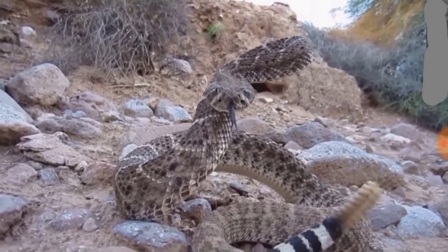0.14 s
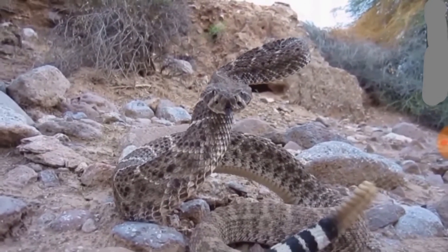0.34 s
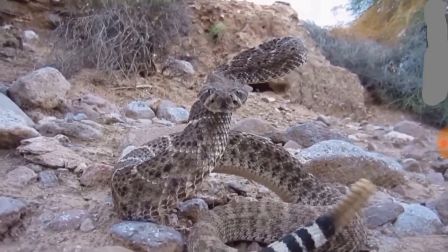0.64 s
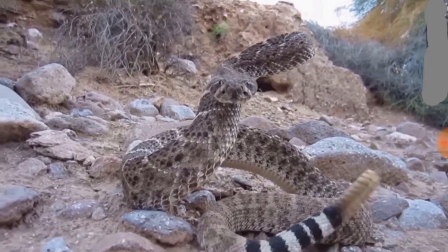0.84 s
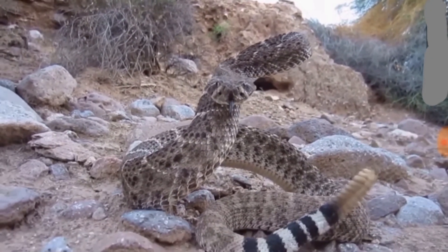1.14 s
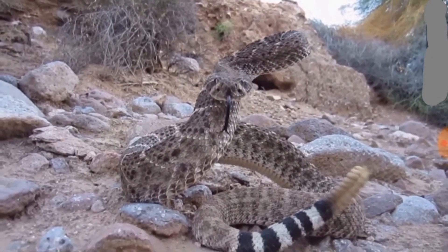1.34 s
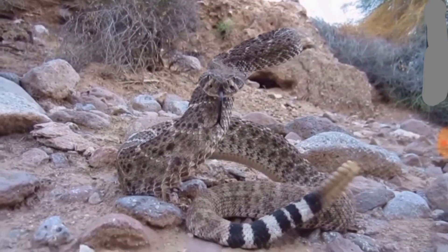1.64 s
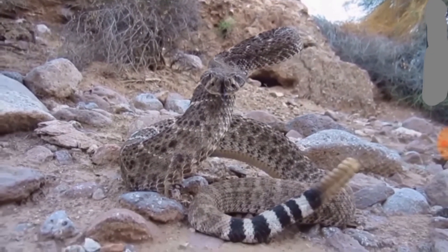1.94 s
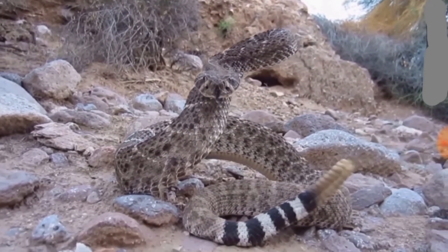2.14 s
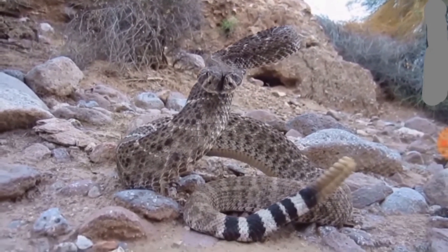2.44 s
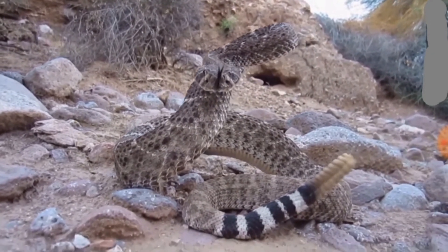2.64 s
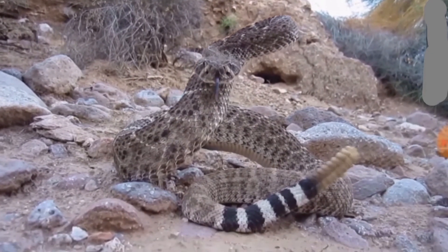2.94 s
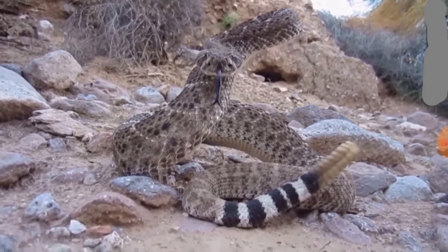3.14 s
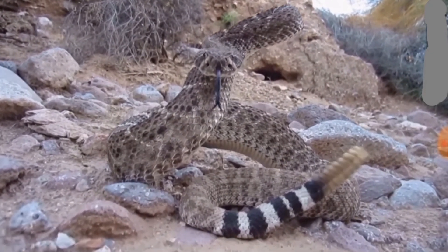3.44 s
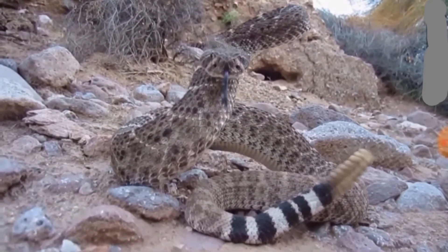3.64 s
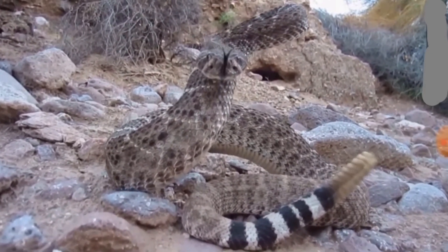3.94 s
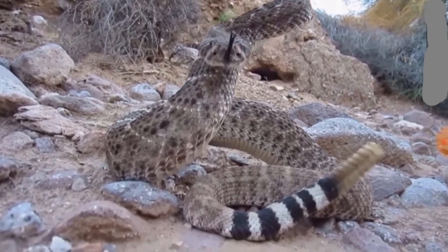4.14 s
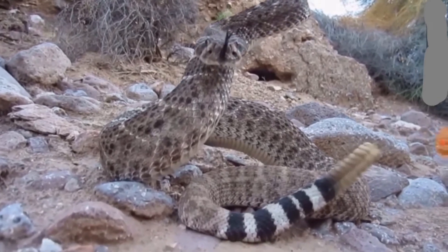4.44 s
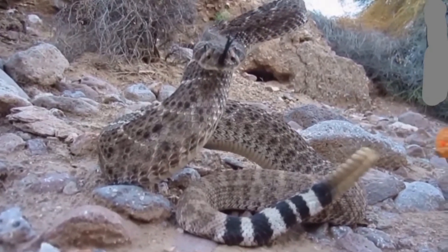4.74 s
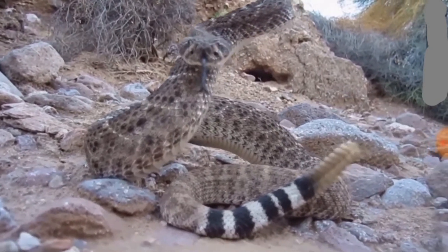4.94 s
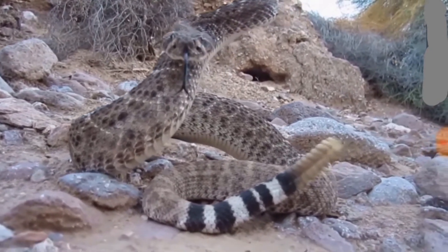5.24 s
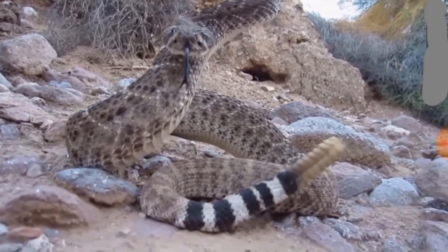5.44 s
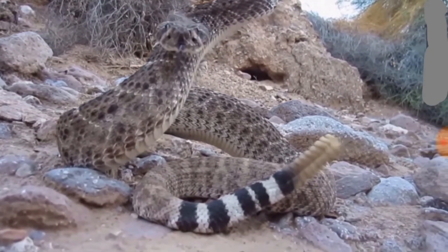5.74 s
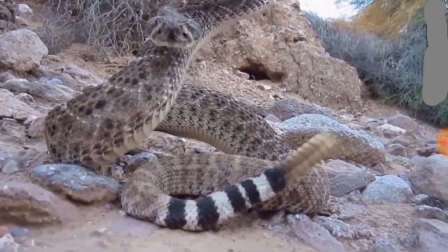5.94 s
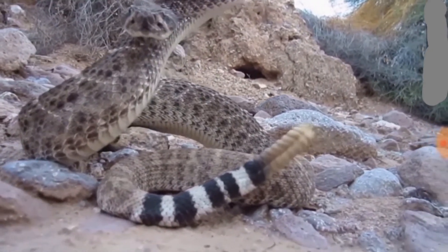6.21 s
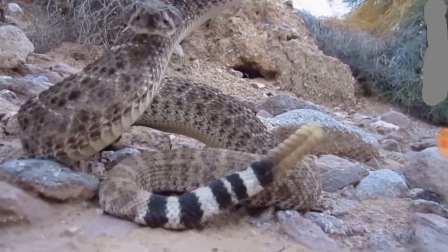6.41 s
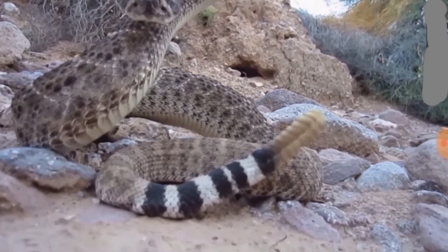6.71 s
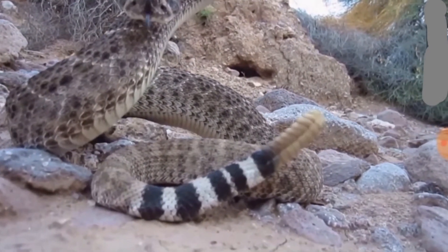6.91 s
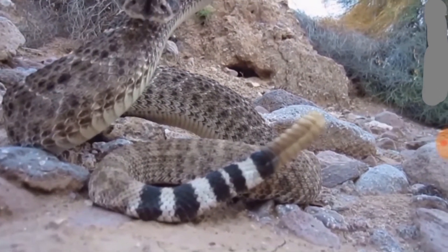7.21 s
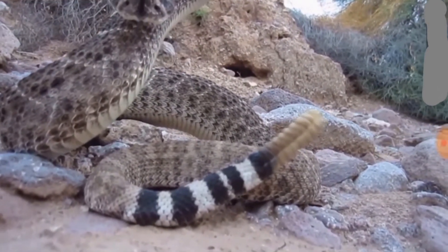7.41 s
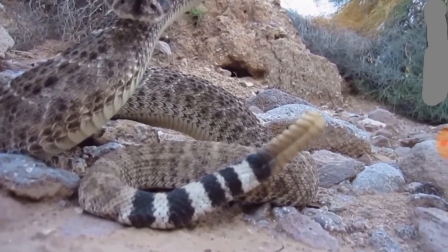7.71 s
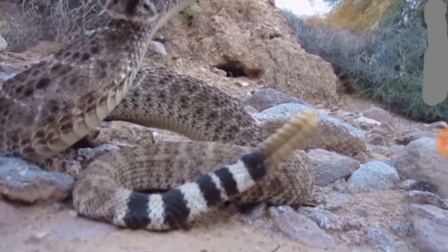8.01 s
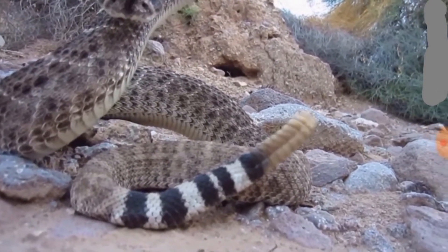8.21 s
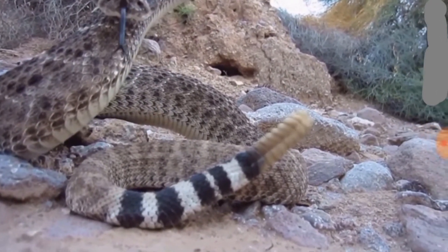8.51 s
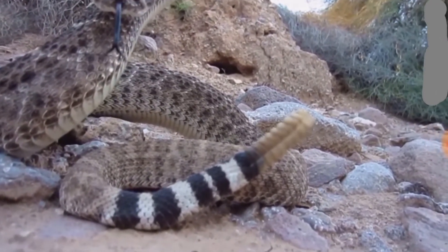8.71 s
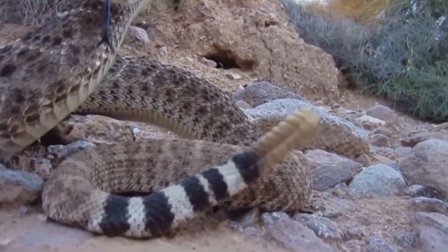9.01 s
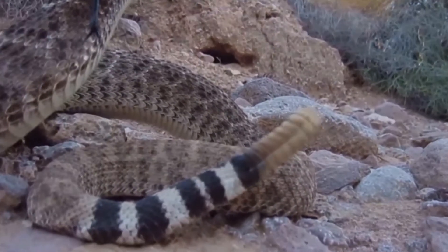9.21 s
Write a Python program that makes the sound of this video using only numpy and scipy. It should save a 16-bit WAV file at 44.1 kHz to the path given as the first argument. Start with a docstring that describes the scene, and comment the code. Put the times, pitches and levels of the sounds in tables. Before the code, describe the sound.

Unbroken bright rattlesnake rattling, like fast-shaken dry husks, with faint low pops beneath that thicken as the microphone moves close, plus brief handling knocks.

```python
"""Rattlesnake and creeping microphone

A rattlesnake shakes its tail about fifty times a second: loose hollow segments clack densely and ring in
broad resonances, whose balance shifts as the microphone creeps nearer over the stones. The level dips
suddenly now and then and creeps back. Brief faint low tones come in clumps, low pops thud under the
rattle, and falling sweeps make a few knocks that travel up the microphone's mount."""
import sys
import numpy as np
from scipy import signal
from scipy.io import wavfile
from scipy.ndimage import uniform_filter1d

SR = 44100
rng = np.random.default_rng(int(sys.argv[2]) if len(sys.argv) > 2 else 0)


def generate_wav(signal):
    """Clip the signal to [-1, 1] and save it as 16-bit WAV at the path in sys.argv[1]."""
    frames = np.transpose(np.atleast_2d(signal))
    scaled = np.clip(frames, -1, 1) * 32767
    pcm = np.round(scaled).astype(np.int16)
    wavfile.write(sys.argv[1], SR, pcm)


N = 412776

# Nearness of the microphone: (time [s], nearness [0 far to 1 close])
MIC_NEARNESS = [(0.7, 0.18), (2.1, 0.23), (3.7, 0.48), (5.1, 0.45), (6.6, 1.0), (8.6, 1)]

SWING_HZ, SWING_DEPTH_DB = 49.3, 0.5
CLACKS_PER_S, CLACK_SPREAD_DB = 16000, 1.34
SHARP_CLACK_DB, SHARP_FROM_HZ = 0.5, 4500   # finer pulsing within each swing, in the treble only
LOW_PATCH_DB_HZ, LOW_PATCH_PER_S = 2400, 14   # dip in dB times resonance in Hz; rate of the drift
DIP_S, RECOVERY_S = 0.0072, 0.34
TONES_PER_S, TONE_S, TONE_DB, TONE_SPREAD_DB = 50, 0.036, -55.5, 3   # level of the lowest tones
POP_RISE_MS, POP_DECAY_MS, SMALL_POP_DECAY_MS = 0.22, 1.46, 1.9
SMALL_POPS_PER_S = 12
FAR_UNTIL_S = 2.4   # pops up to here carry less deep bass
KNOCK_BASS_CUT_HZ = 230
FLOOR_DB = -71
CUTOFF_HZ = 11150
OFFSET = -0.0001   # full scale is 1


def from_db(db):
    """Decibels to gain."""
    return 10 ** (np.asarray(db) / 20)


def rms_one(x):
    """Scale to rms 1."""
    return x / np.sqrt(np.mean(x ** 2) + 1e-20)


def along(rows, s):
    """A curve of (time, value) read at the times s."""
    return np.interp(s, *np.transpose(rows))


def drift(rate):
    """Slow chance: noise at every 40th sample through a double one-pole low-pass at rate Hz; rms 1."""
    r = np.exp(-80 * np.pi * rate / SR)
    noise = rng.standard_normal(N // 40 + 2002)
    slow = signal.lfilter([1], [1, -2 * r, r * r], noise)[2000:]   # skip the filter's start
    return np.interp(np.arange(N) / 40, np.arange(len(slow)), rms_one(slow))


def resonate(x, hz, width):
    """Two-pole resonance applied twice, gain about 1 on top."""
    r = np.exp(-np.pi * width / SR)
    b = (1 - r * r) / 2 * np.array([1, 0, -1])
    a = [1, -2 * r * np.cos(2 * np.pi * hz / SR), r * r]
    return signal.lfilter(b, a, signal.lfilter(b, a, x))


def heard_level_db(t):
    """The level at which the rattle is heard; each dip falls fast and slowly recovers."""
    # Level before the dips: (time [s], level [dB])
    level_before_dips = [(0.0, -25.5), (1.0, -25.5), (2.0, -25), (3.0, -24.5), (4.3, -24.5), (5.2, -26.5),
                         (6.1, -26.5), (6.7, -25), (7.5, -25), (8.0, -24.5), (8.6, -26), (9.1, -28.5),
                         (9.36, -31)]
    # Sudden dips in level: (time [s], depth [dB])
    sudden_dips = [(1.99, 2.5), (2.92, 2.5), (3.78, 2), (4.21, 2), (7.14, 3.5), (8.01, 1.5), (8.67, 0.7),
                   (9.11, 2)]
    level_db = along(level_before_dips, t)
    for s, depth_db in sudden_dips:
        since = np.maximum(t - s, 0)
        level_db = level_db - depth_db * np.minimum(since / DIP_S, 1) * np.exp(-since / RECOVERY_S)
    return level_db


def swell_db(t, hz):
    """Passing swells and fades, added to the resonances within 3 % of their pitch."""
    # Bell-shaped level curves: (resonance [Hz], middle [s], half length [s], gain [dB])
    passing_swells = [(2930, 0.55, 0.99, -11), (3990, 2.14, 0.84, 7), (4370, 3.5, 0.77, 4),
                      (6740, 5.3, 0.57, -2), (1177, 2.2, 0.34, -2.5), (7717, 6, .5, 2),
                      (7000, 5.9, .5, 1.5), (3750, 3.7, 1.0, 5), (3290, 4.1, 0.59, 0.5),
                      (2930, 4.6, 0.65, -4.5), (2920, 1.8, 0.6, -2.5)]
    return sum(db * np.exp(-((t - s) / half) ** 2)
               for at_hz, s, half, db in passing_swells if abs(at_hz / hz - 1) < .03)


def rattle():
    """Clacks swell with each swing of the tail; every resonance takes each clack with its own sign and size."""
    # Segment resonances, relative levels:
    # (centre [Hz], width of each pass [Hz], far [dB], half way [dB], close [dB])
    segment_resonances = [(249, 150, -31, -24, -24), (345, 133, -21, -23, -17),
                          (468, 150, -24.5, -20.5, -19.5), (603, 205, -22.5, -20, -17.5),
                          (854, 416, -15, -13.5, -13), (1177, 523, -11.5, -10, -9),
                          (1600, 400, -13.5, -17, -15.5), (2152, 440, -8.5, -8.5, -7.5),
                          (2370, 230, -7, -2.5, -14), (2573, 297, -1, -9, -7.5), (2912, 520, -12.5, -7, -5),
                          (3287, 375, -8.5, -0.5, -2.5), (3505, 356, -1, -2, -2.5),
                          (3746, 230, -18, -8, -7.5), (3990, 150, -10, -7, -8), (4365, 460, -13.5, -11, -8),
                          (4906, 440, -11.5, -14, -14.5), (5397, 490, -9.5, -11, -8.5),
                          (5740, 370, -11.5, -9, -8.5), (6080, 510, -10.5, -7, -9),
                          (6690, 710, -10, -10.5, -8.5), (7090, 340, -15, -5.5, -2),
                          (7340, 420, -9.5, -1.5, -4), (7760, 850, -10, -10.5, -8.5),
                          (8800, 430, -22, -16.5, -18), (9250, 560, -17.5, -19, -17),
                          (9810, 630, -20.5, -19.5, -19.5), (10230, 400, -29, -29, -21),
                          (11230, 520, -20, -16, -12.5), (2740, 140, -9, -20, -22),
                          (3400, 180, -3, -12, -14), (4160, 250, -13, -23, -20)]
    t = np.arange(N) / SR
    turn = 2 * np.pi * np.cumsum(SWING_HZ * (1 + 0.0152 * drift(1.6))) / SR
    swing = from_db(SWING_DEPTH_DB * (np.cos(turn) + 1.5 * np.cos(2 * turn)))
    bunched = from_db(SHARP_CLACK_DB * (np.cos(3 * turn) + np.cos(4 * turn)))
    struck = rng.random(N) < CLACKS_PER_S / SR
    clacks = struck * from_db(CLACK_SPREAD_DB * np.minimum(rng.exponential(1, N), 5))
    unevenness_db = 0.45 * drift(23.0)   # the shake is never quite steady
    near = along(MIC_NEARNESS, t)
    out = np.zeros(N)
    for hz, width, *levels_db in segment_resonances:
        balance_db = np.interp(near, [0, .5, 1], levels_db) + swell_db(t, hz) + 1.28 * drift(8.9)
        if hz < 600:   # the low resonances are made patchy by random dips
            balance_db -= LOW_PATCH_DB_HZ / hz * np.abs(drift(LOW_PATCH_PER_S))
        pulsing = swing * bunched if hz > SHARP_FROM_HZ else swing
        strikes = pulsing * clacks * rng.standard_normal(N)
        out += from_db(balance_db + unevenness_db) * resonate(strikes, hz, width)
    # small shells radiate no bass
    out = signal.sosfilt(signal.butter(8, 150, "high", fs=SR, output="sos"), out)
    running_rms = np.sqrt(uniform_filter1d(out ** 2, SR // 6))
    return from_db(heard_level_db(t)) * out / running_rms   # the slow level follows heard_level_db alone


def low_tones():
    """Brief faint low sine tones in clumps, at random pitches."""
    # Pitch limits [Hz]: lowest far, lowest close, highest
    pitch_limits = [135, 80, 520]
    chance = TONES_PER_S * from_db(5.0 * drift(3.0)) / SR
    starts = np.flatnonzero(rng.random(N) < chance)
    size, pitch = rng.standard_normal(len(starts)), rng.random(len(starts))
    lowest = np.interp(along(MIC_NEARNESS, starts / SR), [.2, 1], pitch_limits[:2])
    pitch_hz = lowest * (pitch_limits[2] / lowest) ** pitch
    level_db = TONE_DB + TONE_SPREAD_DB * size + 3.0 * pitch
    sample = np.arange(round(TONE_S * SR))
    fade = np.hanning(len(sample))
    out = np.zeros(N + len(sample))
    for at, db, hz in zip(starts, level_db, pitch_hz):
        out[at:at + len(sample)] += from_db(db) * fade * np.sin(2 * np.pi * hz * sample / SR)
    return out[:N]


def thuds(rows, order):
    """A pulse that rises fast and dies away; a high-pass then swings it back through zero."""
    ms = np.arange(-200, 2400) / SR * 1000
    out = np.zeros(N + 2600)
    for s, level_db, return_hz, sign, decay_ms in rows:
        at = round(s * SR)
        rise = np.exp(-(ms / POP_RISE_MS) ** 2)
        decay = np.exp(-(np.abs(ms) / decay_ms) ** 0.88)
        shape = np.where(ms < 0, rise, decay)
        swing_back = signal.butter(order, return_hz, "high", fs=SR, output="sos")
        pulse = signal.sosfilt(swing_back, shape + 1e-18)
        out[at:at + len(ms)] += np.sign(sign) * from_db(level_db) * pulse
    return out[200:N + 200]   # time zero is the top of the pulse


def small_pops():
    """A patter of thin low pops at random moments, with random sign."""
    # Typical level before the swing back [dB]: far, close
    small_level = [-38, -32]
    # Typical swing-back pitch [Hz]: far, close
    small_return = [150, 105]
    s = np.flatnonzero(rng.random(N) < SMALL_POPS_PER_S / SR) / SR
    size, sign, spread, quick = rng.standard_normal((len(s), 4)).T
    near = along(MIC_NEARNESS, s)
    level_db = np.interp(near, [0, 1], small_level) + 2.5 * size
    return_hz = np.interp(near, [0, 1], small_return) * np.exp(0.26 * quick)
    decay_ms = SMALL_POP_DECAY_MS * np.exp(0.39 * spread)
    return thuds(zip(s, level_db, return_hz, sign, decay_ms), order=9)


def pops():
    """Clear low pops of either sign; a steeper high-pass leaves the early ones less deep bass."""
    # Clear pops: (time [s], level before the swing back [dB], swing back [Hz], sign [1 or -1])
    clear_pops = [(0.245, -32, 75, -1), (0.708, -32, 70, 1), (0.771, -35, 110, -1), (1.725, -35, 60, -1),
                  (1.74, -39, 35, 1), (1.992, -31, 180, 1), (2.091, -35, 120, -1), (2.71, -24.5, 80, 1),
                  (2.767, -33, 80, -1), (2.848, -28, 80, -1), (3.253, -32, 80, 1), (3.452, -31, 80, 1),
                  (3.483, -33, 80, 1), (3.797, -35, 60, 1), (4.043, -31, 140, -1), (4.116, -27, 80, 1),
                  (4.493, -41, 105, 1), (5.031, -28, 60, 1), (5.473, -37, 80, -1), (5.486, -29, 60, 1),
                  (5.579, -22.5, 80, 1), (5.831, -33, 105, -1), (5.904, -25, 80, 1), (6.12, -37, 60, -1),
                  (6.232, -34, 80, 1), (6.279, -36, 80, 1), (6.451, -36, 105, 1), (6.461, -24.5, 60, 1),
                  (6.636, -31, 60, 1), (6.651, -29, 140, -1), (6.695, -31, 80, -1), (6.717, -40, 45, 1),
                  (6.735, -30, 80, 1), (6.758, -31, 80, 1), (6.786, -33, 60, 1), (6.814, -30, 105, 1),
                  (6.921, -32, 80, -1), (6.94, -27, 80, 1), (6.956, -31, 60, 1), (6.97, -29, 79.6, -1),
                  (6.98, -37, 35, 1), (7.03, -25, 60, 1), (7.091, -38, 60, 1), (7.172, -36, 60, 1),
                  (7.193, -21, 60, 1), (7.207, -35, 60, -1), (7.394, -20.5, 140, 1), (7.426, -21, 80, 1),
                  (7.462, -21, 60, -1), (7.494, -25, 105, -1), (7.522, -31, 105, 1), (7.693, -28, 80, 1),
                  (7.831, -31, 80, -1), (7.873, -23.5, 80, 1), (8.081, -29, 60, 1), (8.098, -34, 80, -1),
                  (8.189, -33, 60, 1), (8.229, -27, 80, 1), (8.249, -31, 140, 1), (8.279, -35, 140, 1),
                  (8.299, -20.5, 60, -1), (8.333, -21, 60, 1), (8.391, -18.5, 80, -1), (8.406, -30, 60, 1),
                  (8.456, -22.5, 80, 1), (8.485, -29, 80, -1), (8.5, -27, 80, 1), (8.585, -28, 60, 1),
                  (8.605, -32, 80, -1), (8.649, -33, 60, -1), (8.664, -27, 60, 1), (8.675, -31, 80, -1),
                  (8.7, -22.5, 60, 1), (8.711, -37, 35, 1), (8.763, -31, 80, 1), (8.925, -25, 80, -1),
                  (8.958, -21.5, 60, 1), (9.185, -28, 60, 1), (9.309, -32, 45, 1), (9.344, -29, 106, -1)]
    rows = [(*row, POP_DECAY_MS) for row in clear_pops]
    early = [row for row in rows if row[0] <= FAR_UNTIL_S]
    late = [row for row in rows if row[0] > FAR_UNTIL_S]
    return thuds(early, order=4) + thuds(late, order=2)


def knocks():
    """Bending waves: the highs arrive first, so each knock is a brief falling sweep; scraping makes it ragged."""
    # Knocks and scuffs through the mount: (time [s], level before the bass cut [dB],
    # first pitch [Hz], last pitch [Hz], length [s], roughness [0-1])
    mount_knocks = [(7.235, -28, 1900, 1000, 0.0052, 0.2), (7.237, -21.5, 915, 256, 0.012, 0.12),
                    (7.719, -29.5, 1016, 586, 0.089, 0.6), (7.743, -31.5, 800, 600, 0.012, 0),
                    (7.757, -18, 2900, 2000, 0.0045, 0.2), (7.759, -23, 2100, 800, .009, 0),
                    (7.766, -33, 894, 646, 0.0245, 0.1), (7.771, -29, 2000, 905, 0.0116, 0.5),
                    (7.933, -30, 2800, 1290, 0.067, 1), (7.998, -13, 2100, 790, .008, 0.4),
                    (8.005, -35, 850, 500, 0.006, 0.4)]
    out = np.zeros(N)
    # low-passed noise that flutters within a millisecond or two
    ragged = rms_one(signal.lfilter([1], [1, -1.9, .9025], rng.standard_normal(N)))
    for s, level_db, first_hz, last_hz, length, rough in mount_knocks:
        part = np.linspace(0, 1, round(length * SR))
        start = round(s * SR)
        span = slice(start, start + len(part))
        hz = first_hz * (last_hz / first_hz) ** part ** 0.7
        sweep = np.sin(2 * np.pi * np.cumsum(hz) / SR) * np.sin(np.pi * part ** 0.7)
        out[span] += from_db(level_db) * sweep * (1 - rough + rough * ragged[span])
    bass_cut = signal.butter(4, KNOCK_BASS_CUT_HZ, "high", fs=SR, output="sos")
    return signal.sosfilt(bass_cut, out + 1e-18)


def scene():
    """One microphone feeds both channels, over its own faint hiss."""
    hiss = from_db(FLOOR_DB) * rng.standard_normal(N)
    mono = rattle() + hiss + low_tones() + small_pops() + pops() + knocks()
    return np.tile(mono, (2, 1))


def record(dry):
    """The top is cut steeply; the converter sits slightly off zero."""
    top_cut = signal.cheby2(20, 60, CUTOFF_HZ, fs=SR, output="sos")
    return signal.sosfilt(top_cut, dry) + OFFSET


dry = scene()
out = record(dry)
generate_wav(out)
```